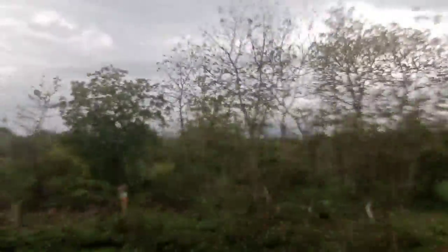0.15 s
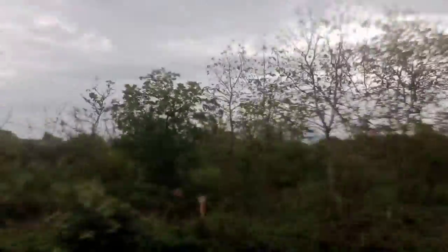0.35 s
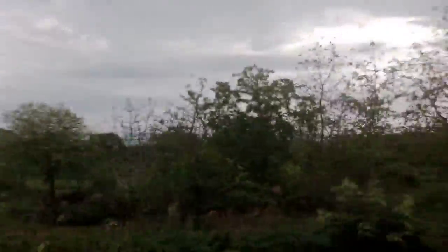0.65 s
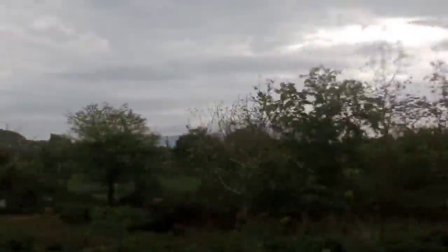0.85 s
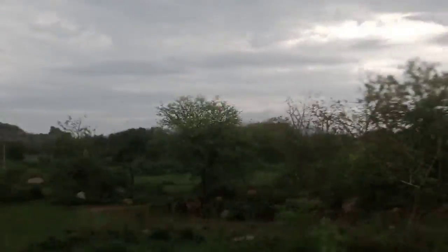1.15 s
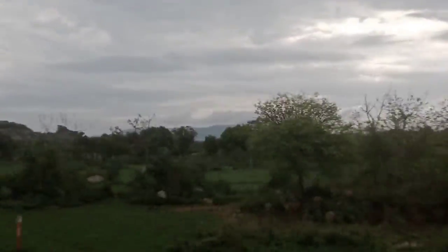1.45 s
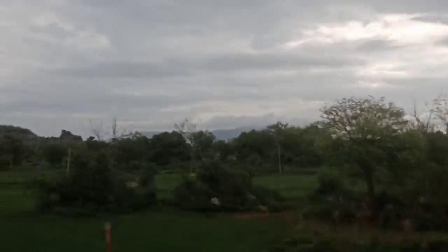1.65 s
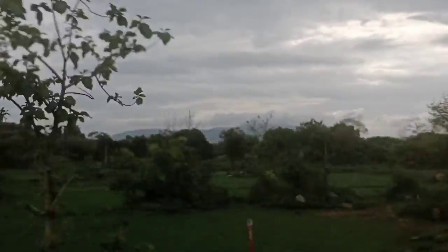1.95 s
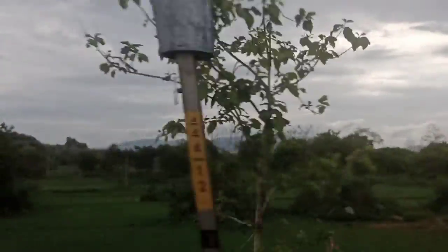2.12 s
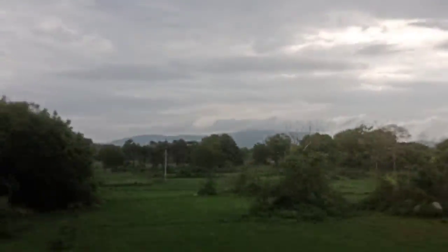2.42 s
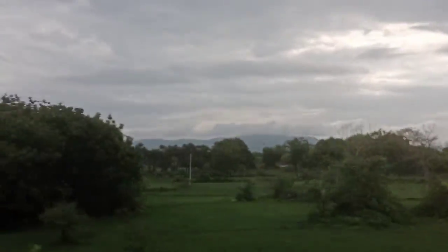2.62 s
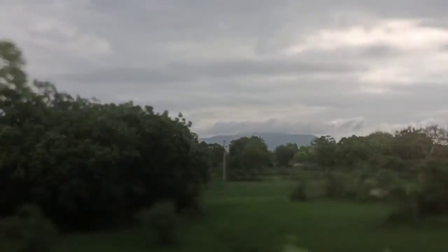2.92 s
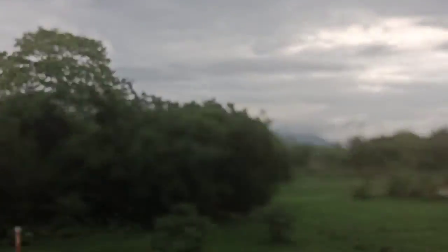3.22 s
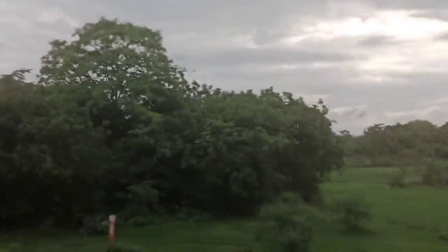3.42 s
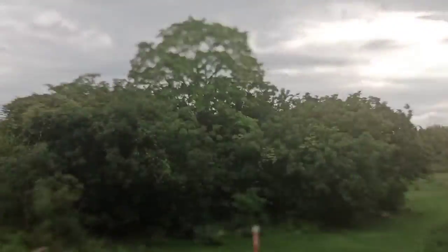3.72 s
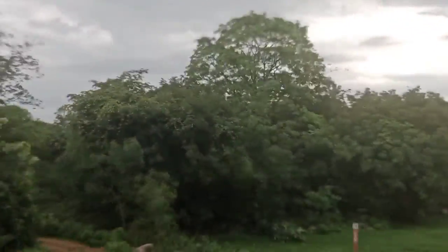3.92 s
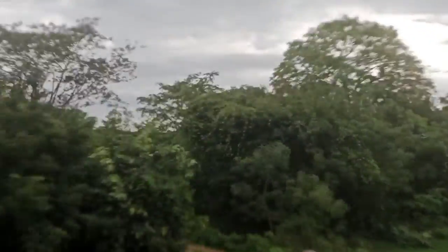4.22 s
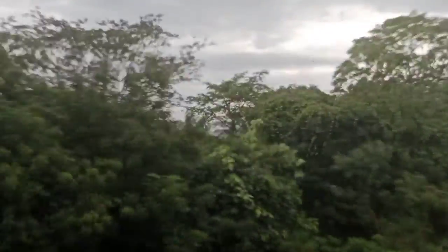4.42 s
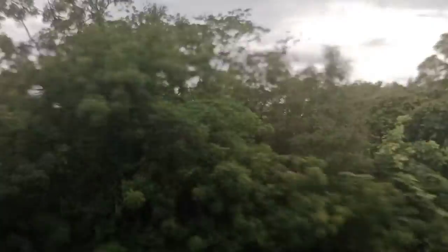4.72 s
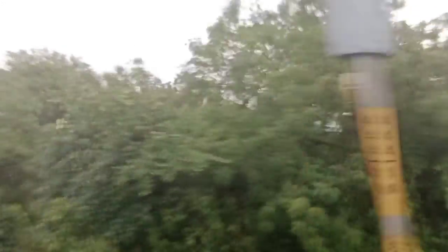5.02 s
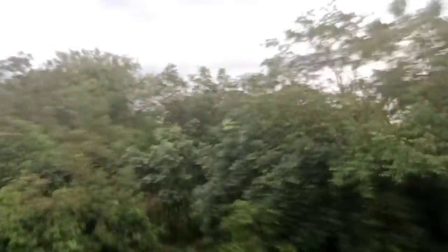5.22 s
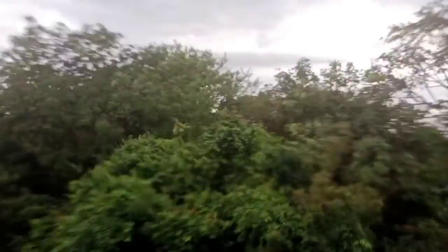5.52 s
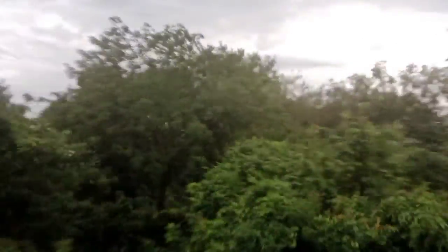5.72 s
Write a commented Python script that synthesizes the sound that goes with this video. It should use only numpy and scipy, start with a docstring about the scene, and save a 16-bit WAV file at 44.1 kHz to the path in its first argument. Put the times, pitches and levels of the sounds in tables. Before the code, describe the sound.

Wind buffets the microphone at a moving train's open window, over roaring wheels, hissing air and a thin steady whine.

```python
"""At the open carriage window of a train at speed, with one microphone in the slipstream.
Close up, eddies buffet the microphone over a fluttering rumble of turbulence.
Behind the wind, wheels roar and ring on the rails, the drive whines and air hisses along the side.
The recorder's limiter ducks everything at each strong buffet."""
import sys
import numpy as np
from scipy import signal
from scipy.fft import rfft, irfft
from scipy.io import wavfile
from scipy.ndimage import uniform_filter1d, minimum_filter1d

SR = 44100
rng = np.random.default_rng(int(sys.argv[2]) if len(sys.argv) > 2 else 0)


def generate_wav(signal):
    """Clip the signal to [-1, 1] and save it as 16-bit WAV at the path in sys.argv[1]."""
    frames = np.transpose(np.atleast_2d(signal))
    scaled = np.clip(frames, -1, 1) * 32767
    pcm = np.round(scaled).astype(np.int16)
    wavfile.write(sys.argv[1], SR, pcm)


N = 258426
T = np.arange(N) / SR
FREQS = np.maximum(np.arange(N // 2 + 1) * SR / N, 1)

# Large eddies striking the microphone. Each row: time of the peak in seconds, level in dB,
# length in seconds, tearing in dB relative to the pressure swing.
LARGE_EDDIES = [(.292, .5, 0.0088, -13.5), (.49, -13.5, 0.0058, -2.5), (.531, -2, .021, -14.5),
                (0.579, -5, 0.013, -6.5), (.669, -9.5, 0.015, -4), (.713, -7, 0.018, -12.5),
                (0.956, -6, 0.018, -9.5), (.984, -6, 0.02, -14), (1.204, -9, 0.0093, -25),
                (1.444, -11.5, 0.013, -27), (1.96, -16.5, 0.073, -13.5), (2.247, -8.5, 0.0061, -18),
                (2.345, -12, .06, -15), (2.535, -10.5, .029, -5), (2.57, -6.5, 0.024, -7),
                (2.882, -7.5, 0.019, -7), (3.179, 3, .017, -7), (3.725, 3, 0.019, -10.5),
                (3.832, 6, 0.029, -7.5), (3.864, -2.5, 0.012, -6), (3.991, -3, .021, -6.5),
                (4.045, 0.5, 0.057, -7), (4.124, 0.5, 0.013, -2.5), (4.151, 2.5, 0.02, -12.5),
                (4.191, 3, .022, -12.5), (4.269, 2.5, .019, -10), (4.336, -11.5, 0.0087, -10),
                (4.485, -6, 0.015, -17), (4.56, 1, 0.041, -11.5), (4.901, -5.5, 0.03, -11.5),
                (4.958, -3, 0.013, -9), (5.016, -9, 0.007, -13), (5.306, -17.5, 0.024, -10)]
# The tearing sound of an eddy. Each row: frequency in Hz, relative level in dB.
TEAR_SPECTRUM = [(20, -60), (120, -18), (250, 6), (450, 5.5), (700, -3), (1200, -7), (1700, -18.5),
                 (2500, -20.5), (4000, -44), (8000, -97)]
# Small eddies rumbling on the microphone. Each row: frequency in Hz, relative level in dB.
RUMBLE_SPECTRUM = [(12, -60), (25, -45), (45, -9.5), (70, -2), (100, 6), (150, -3), (220, 0), (300, -6),
                   (500, -10.5), (1000, -28.5), (2000, -49), (6000, -96)]
# The ride as heard at the window. Each row: time in seconds, rolling gain in dB, turbulence in dB.
RIDE_LEVELS = [(0, -5.5, -22), (.28, 2.5, -15.5), (.7, -6, -25), (.9, -0.5, -17), (1.05, -3.5, -19.5),
               (1.6, -4.5, -19.5), (1.85, -0.5, -14), (2.15, -2.5, -22.5), (2.35, -0.5, -12),
               (2.8, -6, -24.5), (3.25, -.5, -14.5), (3.6, -4, -24.5), (4.0, 5, -13), (4.65, -3, -24),
               (4.85, -0.5, -16.5), (5.25, -5, -22.5), (5.5, -1.5, -18), (5.86, -2.5, -24)]
# The roar of wheels and rails. Each row: frequency in Hz, relative level in dB.
ROAR_SPECTRUM = [(30, -26), (90, -7), (220, -12), (400, 0), (700, 1), (1000, -3.5), (1500, -6),
                 (1900, -5.5), (2700, -7), (3200, -12), (3700, -10), (4300, -19.5), (5500, -78),
                 (9000, -62)]
# The ringing of the wheels. Each row: frequency in Hz, rough width in Hz, relative level in dB.
WHEEL_RESONANCES = [(2208, 350, 5.5), (2414, 47, 1.5)]
# The fundamental of the drive's whine. Each row: time in seconds, level in dB.
WHINE_LEVELS = [(0, -29), (.2, -23.5), (.45, -24.5), (.9, -27.5), (1.3, -25), (2.45, -23), (2.8, -24),
                (3.6, -24.5), (3.95, -14.5), (4.45, -24), (5.2, -26.5), (5.86, -24.5)]
# Air rushing along the carriage. Each row: frequency in Hz, relative level in dB.
AIR_SPECTRUM = [(1500, -60), (3000, -42), (5200, -4.5), (6000, -2.5), (7000, 2.5), (7900, 0), (8600, -5),
                (9300, -16.5), (10000, -13.5), (11500, -18.5), (13000, -20), (13900, -32), (15500, -28)]
# Short, sharp hisses. Each row: time of the peak in seconds, level in dB, length in seconds.
SHARP_HISSES = [(0.88, -33.5, 0.049), (2.43, -36, .07), (2.456, -24, 0.0089)]
# The colour of those hisses. Each row: frequency in Hz, relative level in dB.
SHARP_HISS_SPECTRUM = [(2000, -60), (5000, -14), (7500, 8), (9500, -4), (12500, -10), (14000, -13),
                       (15500, -10)]


def undb(db):
    """Decibels to gain."""
    return 10 ** (np.asarray(db) / 20)


def curves(table):
    """Each level column of a table, joined by straight lines in time."""
    times, *columns = np.transpose(table)
    return [np.interp(T, times, column) for column in columns]


def colour(points):
    """Gain at every frequency from (Hz, dB) points."""
    hz, db = np.transpose(points)
    return undb(np.interp(np.log(FREQS), np.log(hz), db))


def noise(gain):
    """Noise of unit rms with the given spectrum."""
    x = irfft(rfft(rng.standard_normal(N)) * gain, N)
    return x / x.std()


def drift(rate_hz):
    """A smooth random curve of unit spread that changes about rate_hz times a second."""
    return noise(np.exp(-(FREQS / rate_hz) ** 2))


def bell(t, width):
    """A bell curve around t = 0 with the given width at half height."""
    return .5 ** ((2 * t / width) ** 2)


def buffets(wind_db, swing_hz=175.85, pitch_scatter=0.1179, wake_gain=0.17, wake_s=0.047, crackle=0.97):
    """Right on the microphone, each eddy shoves the air, swings the pressure and tears at each crest."""
    out = np.zeros(N)
    offsets = np.arange(-SR // 10, SR // 5)
    t = offsets / SR
    unevenness = np.exp(.36 * drift(180) - .06)
    tearing = noise(colour(TEAR_SPECTRUM)) * undb(3 * drift(250))
    low_rumble = noise(colour(RUMBLE_SPECTRUM) / (1 + (FREQS / 160) ** 4))
    shove = np.tanh(low_rumble) * undb(-2.5)
    eddies = LARGE_EDDIES + weak_eddies(wind_db)
    for peak_s, db, length_s, tear_db in eddies:
        start_phase, detune = rng.uniform(-0.999, 1, 2)
        at = np.clip(int(peak_s * SR) + offsets, 0, N - 1)
        hz = swing_hz * (1 + pitch_scatter * detune) * unevenness[at]
        swing = np.sqrt(2) * np.sin(np.pi * start_phase + 2 * np.pi * np.cumsum(hz) / SR)
        tear = tearing[at] * (1 + crackle * (swing ** 2 - 1)) * undb(tear_db)
        wake = wake_gain * bell(t - wake_s / 2, 2 * wake_s)
        out[at] += undb(db) * (bell(t, length_s) + wake) * (swing + shove[at] + tear)
    return out


def weak_eddies(wind_db, per_second=7, scatter_db=2.5, length_s=0.013, tear_db=-12):
    """Weak eddies arrive by chance, about as strong as the turbulence; rows as in LARGE_EDDIES."""
    count = int(per_second * N / SR)
    timing, strength = rng.random((count, 2)).T
    at = ((np.arange(count) + timing) * N / count).astype(int)
    levels_db = wind_db[at] + scatter_db * (2 * strength - 1)
    return [(peak_s, db, length_s, tear_db) for peak_s, db in zip(T[at], levels_db)]


def slipstream(wind_db, flutter_db=2.0, swing_limit=1.3):
    """Small eddies keep up a fluttering rumble on the microphone; its largest swings flatten."""
    rumble = noise(colour(RUMBLE_SPECTRUM)) * undb(flutter_db * drift(18))
    return swing_limit * np.tanh(rumble / swing_limit) * undb(wind_db)


def wheels(rolling_db, roar_db=-23.5, ring_db=-25.0, waver_db=1.0):
    """Below the window, rough rail drives a broad roar and sets the wheels ringing."""
    roar = noise(colour(ROAR_SPECTRUM)) * undb(roar_db + waver_db * drift(18))
    resonances = sum(undb(db) / (1 + ((FREQS - hz) / (0.63 * width_hz)) ** 2) ** 1.28
                     for hz, width_hz, db in WHEEL_RESONANCES)
    ring = noise(resonances) * undb(ring_db)
    return (roar + ring) * undb(rolling_db)


def drive_whine(rolling_db, start_hz=718.2, rise_hz_per_s=.85, shaft_hz=37.55, throb=0.25):
    """The drive's tone throbs with each shaft turn; its third harmonic follows the rolling level."""
    hz = (start_hz + rise_hz_per_s * T) * (1 + .0008 * drift(20))
    phase = 2 * np.pi * np.cumsum(hz) / SR
    shaft_angle = 2 * np.pi * np.cumsum(shaft_hz * (1 + 0.0555 * drift(4.4))) / SR
    fundamental = np.sin(phase) * undb(curves(WHINE_LEVELS)[0] + 1.4 * drift(10.6))
    swell_db = 2.5 * np.cos(2 * np.pi * (T - 0.18) / 1.99)  # swells about every two seconds
    third = np.sin(3 * phase) * undb(rolling_db - 28.5 + swell_db + 2 * drift(21))
    return np.sqrt(2) * (fundamental + third) * (1 + throb * np.sin(shaft_angle))


def air_hiss(rolling_db, base_db=-32.0, follow=0.93, waver_db=0.6):
    """Air hisses along the side of the carriage, rising and falling with the rolling."""
    return noise(colour(AIR_SPECTRUM)) * undb(base_db + follow * rolling_db + waver_db * drift(25))


def sharp_hisses():
    """Brief bright hisses above the air noise."""
    envelope = sum(undb(db) * bell(T - peak_s, length_s) for peak_s, db, length_s in SHARP_HISSES)
    return noise(colour(SHARP_HISS_SPECTRUM)) * envelope


def scene():
    """Train and wind as they reach the microphone at the window, in mono."""
    rolling_db, wind_db = curves(RIDE_LEVELS)
    train = wheels(rolling_db) + air_hiss(rolling_db) + drive_whine(rolling_db) + sharp_hisses()
    return (train + slipstream(wind_db) + buffets(wind_db))[None]


def limiter(x, ceiling_db, ahead_s, hold_s, release_db_per_s, ramp_s, depth):
    """The gain drops just before each peak over the ceiling, holds, then climbs back at a steady rate."""
    needed_db = depth * np.minimum(ceiling_db - 20 * np.log10(np.abs(x) + 1e-9), 0)
    ahead, hold = int(ahead_s * SR), int(hold_s * SR)
    held_db = minimum_filter1d(needed_db, ahead + hold + 1, origin=(hold - ahead) // 2)
    climb_db = release_db_per_s * T
    gain_db = np.minimum.accumulate(held_db - climb_db) + climb_db
    return x * undb(uniform_filter1d(gain_db, int(ramp_s * SR)))


def record(dry, bass_cut_hz=49, notch_hz=4780, notch_width_hz=620, notch_floor_db=-42, top_hz=15350):
    """The recorder thins the bass, notches the treble, limits peaks in two stages and cuts the top."""
    bass_cut = 1 / np.sqrt(1 + (bass_cut_hz / FREQS) ** 6)
    notch_band = np.exp(-2 * ((FREQS - notch_hz) / notch_width_hz) ** 2)
    notch = (1 - notch_band) ** 1.58 + undb(notch_floor_db)
    x = irfft(rfft(dry[0]) * bass_cut * notch, N)
    # The slow stage ducks the whole sound; the fast one catches the crests that get through.
    x = limiter(x, ceiling_db=-1.1, ahead_s=.023, hold_s=.036, release_db_per_s=63.5,
                ramp_s=.008, depth=.92)
    x = limiter(x, ceiling_db=-1.3, ahead_s=.002, hold_s=.002, release_db_per_s=1500,
                ramp_s=.003, depth=1)
    top_cut = signal.ellip(10, .2, 80, top_hz, fs=SR, output="sos")
    return signal.sosfilt(top_cut, x)[None]


dry = scene()
out = record(dry)
generate_wav(out)
```